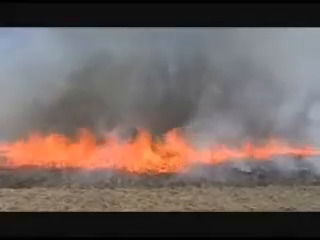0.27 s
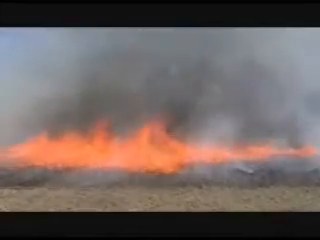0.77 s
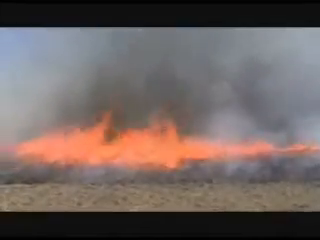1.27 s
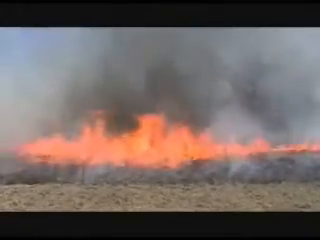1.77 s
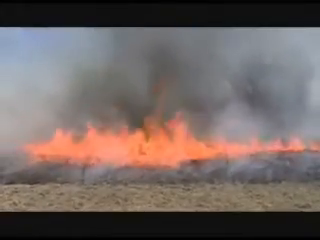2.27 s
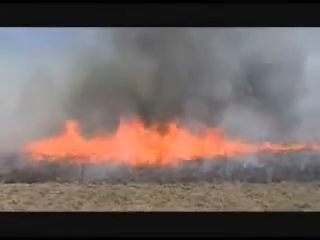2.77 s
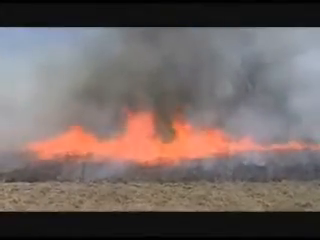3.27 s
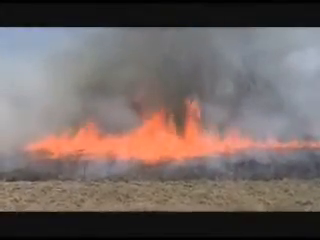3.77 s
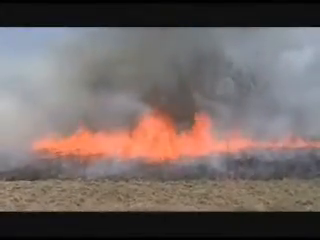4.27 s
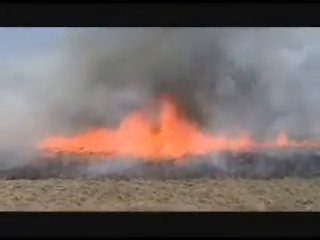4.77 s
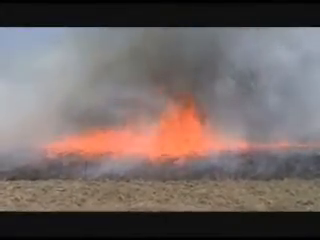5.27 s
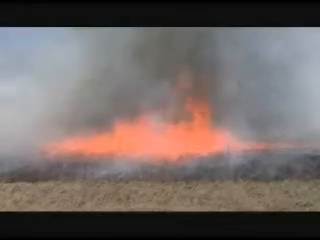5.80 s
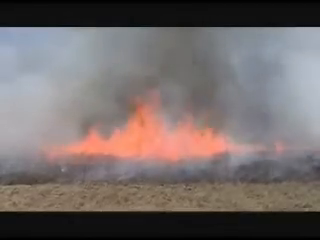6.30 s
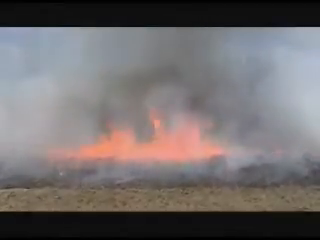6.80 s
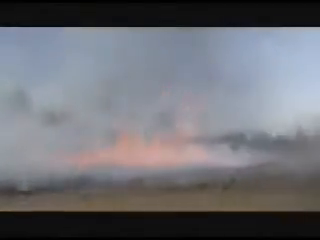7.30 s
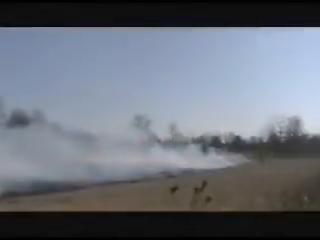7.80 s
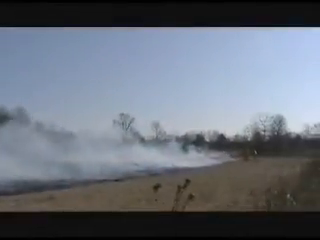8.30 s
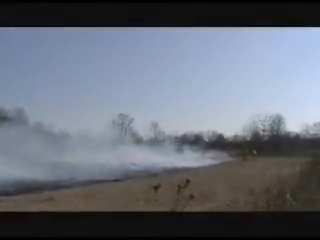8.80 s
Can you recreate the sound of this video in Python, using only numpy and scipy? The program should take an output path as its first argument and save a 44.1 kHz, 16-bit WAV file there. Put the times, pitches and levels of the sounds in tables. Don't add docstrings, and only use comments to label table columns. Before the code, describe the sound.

Outdoors, a line of dry grass burns some metres from a small handheld stereo microphone. From 0 s a loud, dense, bright crackle fills the sound, thousands of tiny snaps fusing into a rain-like hiss, strongest in the upper mids and leaning slightly left. It dips around 0.8 s, swells near 2 s and stays strong to about 4 s. Hard, dry stalk cracks jump out, especially between 0.2 and 4.7 s, clipping slightly and briefly ducking the rest. A weak low roar puffs underneath. From 3 s the treble dulls; the fire thins near 5.7 s. A hollow stem pops at 6 s, a sharp crack follows at 6.2 s, and the crackle rallies briefly. From 7 to 8.2 s it fades away smoothly. Until 9 s only quiet field air, a barely audible low hum and sparse, tiny ember ticks remain, with grainy compressed texture.

```python
import sys
import numpy as np
from scipy import signal
from scipy.fft import rfft, irfft
from scipy.io import wavfile
from scipy.ndimage import uniform_filter1d

SR = 44100
rng = np.random.default_rng(int(sys.argv[2]) if len(sys.argv) > 2 else 0)


def magnitude_from_level(level_db):
    exponent = np.asarray(level_db, float) / 20
    return 10 ** exponent


def generate_wav(signal):
    frames = np.transpose(np.atleast_2d(signal))
    scaled = np.clip(frames, -1, 1) * 32767
    pcm = np.round(scaled).astype(np.int16)
    wavfile.write(sys.argv[1], SR, pcm)


N = 399101

# time in seconds, crackle level in dB.
FRONT = [(0, -13), (.4, -15.5), (.8, -18), (1.4, -16), (2.1, -14.5), (3.8, -15), (5.2, -17), (5.75, -21),
         (6.2, -19.5), (6.5, -18.5), (6.95, -19), (7.3, -24.5), (7.5, -28.5), (7.85, -33), (8.0, -38),
         (8.14, -44), (8.3, -52), (9.05, -58)]
# time in seconds, change in dB.
FLARES = [(.35, 2.5), (.46, -5.5), (.55, 1.5), (.82, -2.5), (.97, 2), (1.25, -1), (1.77, 3), (2.12, 4),
          (2.44, -2.5), (2.5, 1), (2.72, -4), (3.12, 2), (3.16, -5.5), (3.3, 2), (3.74, 4), (4.27, -1.5),
          (4.42, -1.5), (4.47, 3), (6.27, -1), (6.45, 3), (6.67, 2), (6.78, 1.5), (6.92, -0.5)]
# time in seconds, change in dB.
CLEARINGS = [
    (2.1, 4),
    (2.65, 1),
    (6.15, 3.5),
    (7.85, 6.5),
]
# frequency in Hz, level in dB.
CRACKLE = [(150, -40.5), (250, -25.5), (313, -18.5), (565, -14), (815, -16), (1070, -9.5), (1270, -8.5),
           (1570, -6), (3600, 1), (6000, -14.5), (7270, -24.5), (10000, -29), (11400, -46), (14800, -103),
           (22000, -120)]
# start in seconds, peak in dB, pitch in Hz.
THICK_STALKS = [(0.4127, -5, 2720), (0.5074, -1, 3530), (0.5477, -2, 2030), (0.5737, 0, 3260),
                (0.9117, -3, 3240), (1.196, -3, 3900), (1.3349, 1.5, 3400), (1.5833, 1, 3640),
                (1.8074, 0, 3100), (1.9463, -2, 3120), (2.0564, -3, 3080), (2.366, 5, 4300),
                (2.406, -4, 4130), (2.4168, -1.5, 3540), (2.4787, -7, 3100), (2.511, 0.5, 2620),
                (2.7213, -1, 3700), (2.8694, -3.5, 3600), (2.9824, -4, 3720), (3.078, 0.5, 3820),
                (3.1228, -1, 2650), (3.1412, 2, 3160), (3.1761, 2, 3030), (3.2365, -7.5, 3200),
                (3.2954, -3.5, 3600), (3.3204, 2, 3660), (3.3944, 0.5, 2610), (3.4401, 1, 3530),
                (3.5598, -6, 4230), (4.9921, -4, 2640)]
# start in seconds, peak in dB, pitch in Hz, dullness as a ratio, T60 in seconds.
NEAR_CRACKS = [
    (0.1993, 1.5, 2600, 1.2, .012),
    (.3596, 1.5, 4150, .9, 0.01),
    (1.7728, 1, 3620, 1, 0.015),
    (2.1685, 3, 3170, 0.69, .012),
    (2.6006, 2, 3540, .9, .016),
    (3.8456, .5, 2750, 1.2, 0.011),
    (4.2598, -1, 3770, 1.15, 0.011),
    (4.7275, -0.5, 3400, 0.98, .01),
    (6.2412, -0.5, 3900, 0.69, 0.024),
]
# start in seconds, peak in dB, pitch in Hz, T60 in seconds.
HOLLOW_STEM = (6.0131, -5.5, 600, .012)
# start in seconds, peak in dB, pitch in Hz, bright edge in dB, share of rustle.
EMBER_TICKS = [(8.0703, -16, 2620, -36, 0.65), (8.2494, -30, 2310, -24, 0.36), (8.327, -26, 2910, -8, 0.69),
               (8.4457, -23, 4000, -18, 0.12), (8.4794, -30, 1630, -14, 0.7), (8.622, -28, 2390, -26, 0.72),
               (8.6612, -31, 4500, -11, 0.3), (8.72, -36, 1790, -27, 0.4), (8.764, -32, 4540, -12, 0.8),
               (8.8248, -35, 5000, -6, 0.2), (8.8484, -35, 3040, -16, 0.4), (8.8614, -31, 6120, -14, 0.3),
               (8.879, -22, 4000, -19, 0.1), (8.924, -31, 3130, -24, 0.7), (9.0177, -29, 3440, -20, 0.8)]
# frequency in Hz, level in dB.
ROAR = [(15, -37), (25, -39), (67, -2), (96, 2.5), (157, 2.5), (303, -5), (330, -15), (430, -51),
        (730, -120)]
# time in seconds, change in dB.
PUFFS = [(0, 6), (.61, -10), (.8, -5.5), (1.34, 2.5), (2.13, 10), (2.4, -4), (4.0, 2), (4.62, 5.5),
         (5.05, -4), (5.6, -2), (6.36, 2)]
# frequency in Hz, level in dB.
FIELD = [(120, -36), (200, 0.5), (621, -2), (871, -4.5), (1520, -8), (2990, -11), (7330, -18.5),
         (10800, -29.5), (11400, -61), (14800, -94), (22000, -120)]
# frequency in Hz, width in Hz, level in dB.
HUMS = [
    (150.4, 3.0, -55),
    (62.5, 5.0, -60),
    (125.5, 5.0, -60),
]
# frequency in Hz, side minus mid in dB.
WIDTH = [(60, -13.5), (110, -8.5), (190, -8.5), (340, -6), (610, -5.5), (1080, -8), (1930, -12),
         (3440, -12), (6120, -1.5), (10900, 0.5)]
# frequency in Hz, left minus right in dB.
LEAN = [(60, 8.5), (110, 3.5), (190, 5), (340, 4.5), (610, 8), (1080, 6), (1930, 3.5), (3440, 1.5),
        (6120, 1.5), (10900, 6.5)]
# frequency in Hz, mid limit in dB, side limit in dB.
WEAK_LINES = [(300, -20, -14), (1500, -20, -8), (5000, -16, -6), (7000, -5, -1), (10000, 0, 2)]
# frequency in Hz, share of time early, share of time late.
HOLES = [(240, 0, 0), (300, .7, .1), (370, 0, 0), (4500, 0, 0), (5500, 0, .05), (6600, 0, .06),
         (7350, .4, .65), (7800, .12, .2), (8600, .2, .35), (9250, .55, .75), (9700, .15, .3),
         (10300, .25, .55), (10800, .75, .95), (11100, .92, 1)]
# start in seconds, length in seconds, lowest frequency in Hz.
MONO_MOMENTS = [(.027, .1, 300), (.909, .105, 300), (1.27, .13, 300), (1.749, .11, 300), (2.019, .15, 4100),
                (2.09, .055, 300), (2.47, .14, 300), (3.037, .075, 4080), (3.275, .075, 300),
                (3.736, .075, 300), (3.963, .065, 300), (4.537, .095, 300), (5.24, .06, 4100),
                (5.982, .055, 4080), (6.285, .175, 298), (7.43, .04, 4100), (7.7, .19, 4100),
                (7.97, .815, 3970), (8.84, .03, 4100), (8.955, .1, 4100)]

FLARE_S, CLEARING_S, PUFF_S = 0.031, 0.2, 0.039
STALKS_PER_S, STALK_OVER_DB, STALK_SPREAD_DB = 24, 9, 2.0
STALK_HZ, STALK_OCTAVES = 3400, 0.22
SMOKE_FROM_S, SMOKE_TO_S, SMOKE_DB = 2.9, 3.8, -7
TOP_DB, TOP_LAGS, TOP_FLARES = -13.5, 0.2, 0.4
LOW_DB, LOW_LAGS = 0.76, 0.24
ROAR_DB, ROAR_FOLLOWS = -40.5, 0.39
FIELD_DB = -44
FAINT_FROM_S, FAINT_DB, FAINT_SPREAD_DB = 8.1, -38, 5
GROUND_S, GROUND_DB, GROUND_CUT_HZ = 0.001874, -15.5, 2050
TAPS = 2048
GRID_HZ = np.arange(TAPS // 2 + 1) * SR / TAPS


def crackle(top_db, low_db, per_s, spread_db, clump_db, colour_db):
    clumps = clump_db * (drift(60.0) + 0.6 * drift(18.0))
    born = rng.random(N) < per_s * magnitude_from_level(clumps) / SR
    strength_db = spread_db * np.minimum(rng.exponential(1, N), 4.0)
    clicks = born * magnitude_from_level(strength_db) * rng.choice([-1, 1], N)
    direction = rng.standard_normal(N)
    thickness = rng.integers(0, 6, N)
    out = np.zeros((2, N))
    for k, hz in enumerate(np.geomspace(500, 9000, 6)):
        bump_db = colour_db * np.exp(-np.log2((GRID_HZ + 1) / hz) ** 2 / 0.6)
        colour = at_hz(CRACKLE, GRID_HZ) + bump_db
        own = clicks * (thickness == k)
        out += [coloured(own, colour), coloured(own * direction, colour)]
    both = ground(out)
    top = signal.sosfilt(signal.butter(1, 8000, "high", fs=SR, output="sos"), both)
    low = signal.sosfilt(signal.butter(1, 700, fs=SR, output="sos"), both)
    both = both + top * (magnitude_from_level(top_db + 16.5) - 1) + low * (magnitude_from_level(low_db) - 1)
    return pair(*both / np.std(both[0]))


def lesser_stalks(front_db):
    when, keep, size, pitch = rng.random((400, 4)).T
    level_db = front_db[(when * N).astype(int)]
    kept = keep < STALKS_PER_S * magnitude_from_level(level_db + 15.0) * N / SR / 400
    peak_db = level_db + STALK_OVER_DB + STALK_SPREAD_DB * 2 * (2 * size - 1)
    hz = STALK_HZ * 2 ** (STALK_OCTAVES * 2 * (2 * pitch - 1))
    return np.transpose([when * N / SR, peak_db, hz])[kept]


def stalk_snaps(front_db):
    out = empty_track()
    for s, db, hz in [*THICK_STALKS, *lesser_stalks(front_db)]:
        snap = coloured(burst(hz, 0.011, rough=3, rise=0.0007), 0.8 * at_hz(CRACKLE, GRID_HZ))
        add(out, s, magnitude_from_level(db - 3.5) * peak_one(snap), 1.7 + 1.5 * rng.standard_normal())
    return out[:, :N]


def near_cracks():
    out = empty_track()
    for s, db, hz, dullness, t60 in NEAR_CRACKS:
        crack = coloured(burst(hz, t60, rough=2.7, rise=0.00065), dullness * at_hz(CRACKLE, GRID_HZ))
        add(out, s, magnitude_from_level(db) * peak_one(crack), 4)
    return out[:, :N]


def hollow_stem():
    out = empty_track()
    s, db, hz, t60 = HOLLOW_STEM
    push = burst(hz, t60, rough=0.1, rise=0.0004)[:90] * np.hanning(180)[90:] ** 0.3
    add(out, s, magnitude_from_level(db) * push, 0.6)
    add(out, s + 0.0014, -magnitude_from_level(db + 1.5) * burst(2300, 0.003, rough=0.1), 0.6)
    return out[:, :N]


def faint_embers():
    when, size, pitch, edge = rng.random((22, 4)).T
    s = FAINT_FROM_S + when * (N / SR - FAINT_FROM_S)
    peak_db = FAINT_DB + FAINT_SPREAD_DB * (2 * size - 1)
    return list(zip(s, peak_db, 1500 * 4 ** pitch, -26 + 14 * edge, 0.3 + 0 * s))


def ember_ticks():
    out = empty_track()
    band = signal.butter(2, [1000, 7000], "band", fs=SR, output="sos")
    edge = signal.butter(2, [5500, 10500], "band", fs=SR, output="sos")
    for s, db, hz, edge_db, rustle in [*EMBER_TICKS, *faint_embers()]:
        body = burst(hz, 0.002, rough=0.8) + rustle * burst(hz, 0.025, rough=3, rise=0.001)
        bright = signal.sosfilt(edge, burst(8000, 0.005, rough=3))
        tick = signal.sosfilt(band, body) + magnitude_from_level(edge_db + 12) * bright
        add(out, s, magnitude_from_level(db) * peak_one(tick), 0.6)
    return out[:, :N]


def roar():
    mid, side = [coloured(rng.standard_normal(N), at_hz(ROAR, GRID_HZ)) for _ in "ms"]
    return pair(rms_one(mid), rms_one(side)) * magnitude_from_level(1.5 * drift(7.4))


def field():
    mid, side = [rms_one(coloured(rng.standard_normal(N), at_hz(FIELD, GRID_HZ))) for _ in "ms"]
    side = 0.93 * signal.lfilter(*signal.butter(1, 1200, fs=SR), side)
    out = magnitude_from_level(FIELD_DB - 2.5) * np.array([mid + side, mid - side]) * magnitude_from_level([[1.5], [-1.5]])
    for hz, width, db in HUMS:
        r = np.exp(-np.pi * width / SR)
        resonance = [1, -2 * r * np.cos(2 * np.pi * hz / SR), r * r]
        hum = signal.lfilter([1, 0, -1], resonance, rng.standard_normal(N))
        out += magnitude_from_level(db) * rms_one(hum) * magnitude_from_level([[3.0], [-3.0]])
    return out


def ground(x):
    lag = round(GROUND_S * SR)
    dull = signal.lfilter(*signal.butter(1, GROUND_CUT_HZ, fs=SR), x)
    return x + magnitude_from_level(GROUND_DB) * np.pad(dull, ((0, 0), (lag, 0)))[:, :N]


def pair(mid, side):
    side = coloured(side, at_hz(WIDTH, GRID_HZ))
    lean = at_hz(LEAN, GRID_HZ) / 2
    return np.array([coloured(mid + side, lean), coloured(mid - side, -lean)])


def burst(hz, t60, rough, rise=0.00013):
    t = np.arange(1024) / SR
    ring = np.sin(2 * np.pi * hz * t) + rough * rng.standard_normal(1024)
    return peak_one(ring * magnitude_from_level(-60 * t / t60) * np.minimum(t / rise, 1))


def empty_track():
    return np.zeros((2, N + 2 * TAPS))


def add(out, s, wave, left_db):
    at = round(s * SR)
    out[:, at:at + len(wave)] += wave * magnitude_from_level([[left_db / 2], [-left_db / 2]])


def peak_one(x):
    return x / np.abs(x).max()


def rms_one(x):
    return x / np.sqrt(np.mean(x ** 2) + 1e-20)


def drift(rate):
    r = np.exp(-16 * np.pi * rate / SR)
    slow = signal.lfilter([1], [1, -2 * r, r * r], rng.standard_normal(N // 8 + 4002))[4000:]
    return np.interp(np.arange(N) / 8, np.arange(len(slow)), rms_one(slow - slow.mean()))


def bumps(rows, width_s):
    t = np.arange(0, N, 64) / SR
    change_db = sum(db * np.exp(-((t - s) / width_s) ** 2) for s, db in rows)
    return np.interp(np.arange(N) / SR, t, change_db)


def at_hz(points, hz):
    points = np.array(points)
    return np.interp(np.log(hz + 1), np.log(points[:, 0] + 1), points[:, 1])


def coloured(x, db):
    cepstrum = irfft(db * np.log(10) / 20)
    cepstrum[1:TAPS // 2] *= 2
    cepstrum[TAPS // 2 + 1:] = 0
    return signal.oaconvolve(x, irfft(np.exp(rfft(cepstrum))))[:N]


def scene():
    t = np.arange(N) / SR
    front_db = np.interp(t, *np.transpose(FRONT))
    vigour_db = front_db + 15.0
    smoke_db = np.interp(t, [SMOKE_FROM_S, SMOKE_TO_S], [0, SMOKE_DB]) + bumps(CLEARINGS, CLEARING_S)
    flare_db = bumps(FLARES, FLARE_S)
    top_db = TOP_DB + smoke_db + TOP_FLARES * flare_db - TOP_LAGS * vigour_db
    low_db = LOW_DB - LOW_LAGS * vigour_db
    fire = crackle(top_db, low_db, per_s=7000, spread_db=0.5, clump_db=1.43, colour_db=4.5)
    fire = magnitude_from_level(front_db + flare_db) * fire
    snaps = stalk_snaps(front_db) + near_cracks() + hollow_stem() + ember_ticks()
    roar_db = ROAR_DB + ROAR_FOLLOWS * vigour_db + bumps(PUFFS, PUFF_S)
    return fire + snaps + magnitude_from_level(roar_db) * roar() + field()


def dropouts(x):
    hz, t, frames = signal.stft([x[0] + x[1], x[0] - x[1]], SR, "cosine", nperseg=2048)
    size = np.abs(frames)
    limits = np.array(WEAK_LINES)
    for k in range(2):
        nearby = uniform_filter1d(size[k], size=33, axis=0)
        frames[k] *= size[k] > nearby * magnitude_from_level(at_hz(limits[:, [0, k + 1]], hz))[:, None]
    mono = np.zeros(len(t))
    for start, length, above_hz in MONO_MOMENTS:
        inside = (t > start) & (t < start + length)
        frames[1][np.ix_(hz > above_hz, inside)] = 0
        mono[inside] = 1
    holes_hz, early, late = np.transpose(HOLES)
    early, late = np.interp(hz, holes_hz, early), np.interp(hz, holes_hz, late)
    share = early[:, None] + np.outer(late - early, np.clip((t - 3) / 2, 0, 1))
    share = share * (0.8 + mono * (t < 7.5))
    chance = uniform_filter1d(rng.standard_normal(share.shape), size=9)
    wide = uniform_filter1d(chance, size=7, axis=0)
    narrow = uniform_filter1d(chance, size=2, axis=0)
    chance = np.where(hz[:, None] > 1000, wide, narrow)
    rank = chance.argsort().argsort() / len(t)
    mid, side = signal.istft(frames * (rank >= share), SR, "cosine", nperseg=2048)[1][:, :N] / 2
    return np.array([mid + side, mid - side])


def band_limit(x):
    return signal.sosfilt(signal.butter(12, 11520, fs=SR, output="sos"), x)


def record(dry):
    t = np.arange(N) / SR
    over_db = np.maximum(20 * np.log10(np.abs(dry).max(axis=0) + 1e-9) + 1.06, 0)
    held_db = np.maximum.accumulate(over_db + 149.96 * t) - 150.08 * t
    r = np.exp(-1 / (0.004 * SR))
    duck_db = signal.lfilter([1 - r], [1, -r], held_db)
    mix = np.clip(dropouts(dry * magnitude_from_level(-0.9 * duck_db)), -1, 1)
    return band_limit(mix)


dry = scene()
out = record(dry)
generate_wav(out)
```